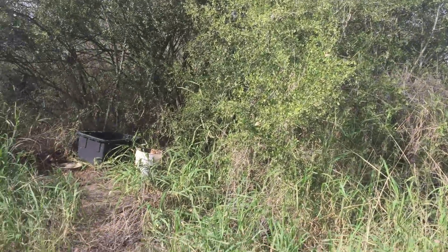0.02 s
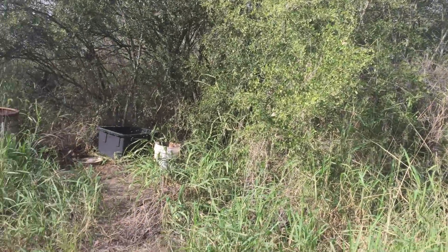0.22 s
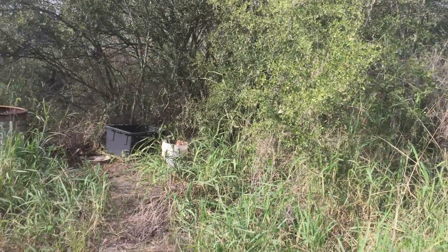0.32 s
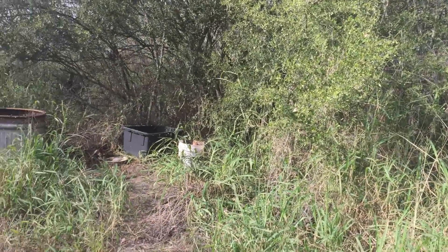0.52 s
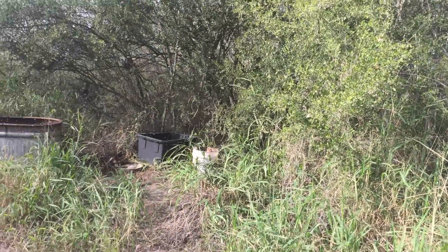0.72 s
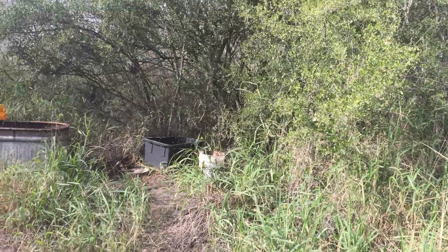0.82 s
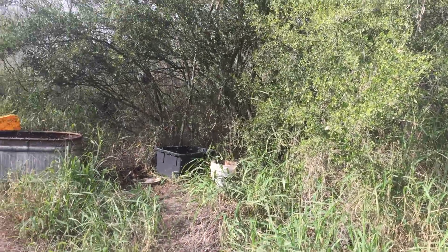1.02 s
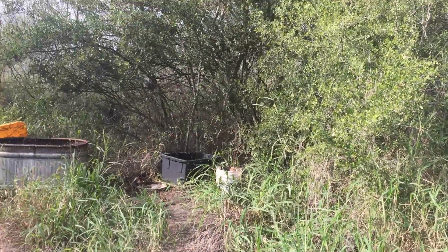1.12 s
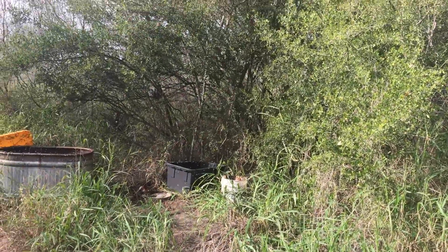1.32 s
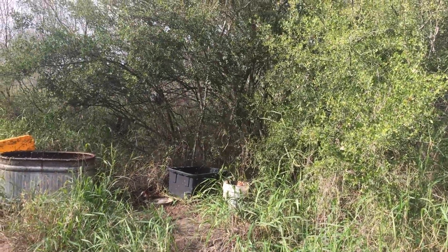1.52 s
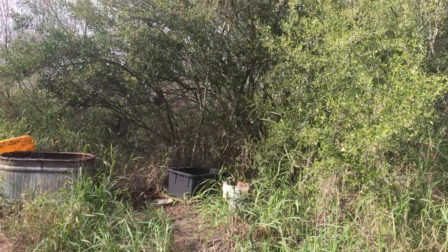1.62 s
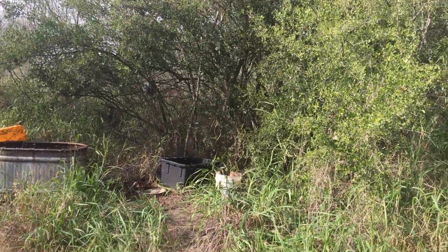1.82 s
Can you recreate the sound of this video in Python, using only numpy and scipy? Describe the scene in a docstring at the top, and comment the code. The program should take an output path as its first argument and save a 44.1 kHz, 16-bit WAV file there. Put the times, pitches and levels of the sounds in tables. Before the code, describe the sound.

Metal hammered hard on thin metal, five loud ringing clangs at a steady pace, outdoors in brush

```python
"""Metal hammered on metal in open brushland, about three blows a second: impulsive excitation of damped modes.
Each blow sums a contact crack and thud, discrete clang modes and a dense sheet-metal crash;
a softer set of modes, slower to decay, rings on from blow to blow, and the brush returns a diffuse noise echo.
Behind lie a brief sine hum, coloured-noise air, and narrow noise bands for an insect, faint rustles and chirps,
and a short swell at the very end. The microphone overloads, compressing the peaks, and is band-limited."""
import sys
import numpy as np
from scipy import signal
from scipy.fft import rfft, irfft, next_fast_len
from scipy.io import wavfile

SR = 44100
rng = np.random.default_rng(int(sys.argv[2]) if len(sys.argv) > 2 else 0)


def dump_mix(stems):
    """Bounce the given channels to the path in sys.argv[1] as a 16-bit WAV at rate SR."""
    frames = np.atleast_2d(stems).T  # one column per channel
    limited = np.clip(frames, -1, 1)  # hard clip at full scale
    pcm = np.round(limited * 32767).astype(np.int16)
    wavfile.write(sys.argv[1], SR, pcm)


N = 83790
T = np.arange(SR) / SR  # one second of time for each blow, t/s

# Blows, the first heard only as it rings out: [t/s, relative level/dB]
BLOW_TIMES = [(-.135, -2.5), (0.2034, -1), (0.5342, -1), (0.8766, -1), (1.2264, -1.5), (1.5689, -1.96)]
# Modes of the damped piece that clangs, some slow to build: [f/Hz, relative level/dB, t60/s, rise/s]
CLANG_MODES = [(495, -19, .13, .002), (567, -23, .19, .004), (727, -9, .12, .004), (796, -19, .17, .004),
               (818, -22, .16, .004), (944, -13, .2, .003), (1061, -16, .27, .05), (1189, -12, .12, .005),
               (1280, -19, .12, .001), (1368, -20, .12, .005), (1407, -20, .2, .005),
               (1558, -22, .27, .008), (1605, -2, .13, .05), (1634, -5, .17, .025), (1662, 3, .115, .045),
               (1703, 0, .13, .027), (1747, -21, .11, .001), (1768, -18, .19, .04), (2005, -13, .13, .038),
               (2042, -17, .2, .001), (2309, -23, .28, .007), (2543, -10, .125, .01),
               (2660, -9, .125, .028), (2774, -17, .11, .001), (2888, -13, .11, .002),
               (2916, -22, .26, .04), (3000, -15, .15, .002), (3113, -13, .14, .05), (3197, -21, .13, .001),
               (3647, -15, .135, .002), (4433, -15, .12, .004), (4577, -23, .18, .001),
               (4631, -14, .15, .001), (5318, -20, .12, .001), (5483, -18, .11, .001)]
# Modes of the free piece that rings on: [f/Hz, relative level/dB, t60/s, rise/s]
RING_MODES = [(119.6, -51, 1, .01), (166, -51, 0.99, .01), (205.6, -48, 1.4, 0.012),
              (242, -46.5, 1.84, 0.0084), (328.3, -46, 1.3, 0.013), (449, -40.5, 0.88, 0.0091),
              (703.4, -33, 0.88, .004), (752.7, -27, 1.04, 0.0045), (805.5, -32.5, 0.85, 0.0045),
              (1022, -28.5, 0.7, .004), (1070, -31.5, .62, 0.0044), (1230, -29, 0.65, .004),
              (1335, -40.5, 0.89, .004), (1485, -31, 1.02, 0.0036), (1625, -29, 0.7, .004),
              (1787, -38.5, 0.71, 0.0032), (2540, -46, 0.91, .004)]
# Spectral envelope of the sheet's dense modes: [f/Hz, relative density level/dB]
CRASH_SPECTRUM = [(60, -20), (250, -20), (480, -7.5), (660, -11.5), (900, -5), (1350, -0.5), (1900, -3.5),
                  (2300, -5.5), (3000, -6), (3900, -7), (5300, -6), (6300, -9.5), (7500, -10),
                  (8300, -14.5), (10800, -23), (15000, -17.5)]
# Decay of the sheet's dense modes: [f/Hz, t60/s]
CRASH_DECAY = [(150, 0.3), (600, 0.19), (1500, 0.23), (3000, 0.21), (5000, 0.15), (8000, 0.14),
               (15000, 0.12)]
# Spectral envelope of the echo from the brush: [f/Hz, relative level/dB]
BRUSH_SPECTRUM = [(100, -12.5), (500, -12), (1000, 10.5), (1700, 10.5), (3000, -6.5), (5000, -7),
                  (8000, -19.5), (14000, -27.5)]
# Decay of the echo from the brush: [f/Hz, t60/s]
BRUSH_DECAY = [(200, .9), (1500, .7), (4000, .48), (12000, .33)]
# Spectral envelope of the background air: [f/Hz, relative density level/dB]
AIR_SPECTRUM = [(20, -32), (50, -12), (85, -3), (140, -4), (300, -10), (1000, -13), (1700, -14),
                (2500, -21), (4500, -32), (9000, -41), (16000, -46)]
# Buzzes of the far insect: [start t/s, end t/s]
BUZZ_TIMES = [(.09, 0.47), (1.48, 2.5)]
# Faint rustles and chirps in the brush; the last row is a short noise swell at the very end,
# about when the next blow is due: [centre t/s, full width at 1/e t/s, centre f/Hz, level/dB]
NOISE_SWELLS = [(0.1, 0.074, 3140, -52.5), (0.51, 0.019, 6300, -58), (1.505, .05, 2950, -59),
                (1.5, 0.033, 4900, -59), (1.9, 0.022, 3200, -44)]

CRACK_DB, CRACK_T60_S, CRACK_CORNER_HZ = -4, 0.014, 5000
THUD_DB, THUD_HZ, THUD_T60_S = -28, 92, 0.072
CLANG_DB, RING_DB = 2, -0.5  # added to the levels in the mode tables
MODE_SCATTER_DB = 1  # standard deviation of mode level, drawn anew at each blow
CRASH_DB, CRASH_RISE_S = -4, 0.0029
CRASH_CHANGE = 0.21  # amplitude of the part drawn anew at each blow, beside the constant part
SHEET_UNEVEN_DB = 2  # standard deviation of level among the dense modes
BRUSH_DB, BRUSH_RISE_S = -31, .02
HUM_HZ, HUM_RMS_DB, HUM_END_S, HUM_FADE_S = 87.3, -54, .6, .1
AIR_DB = -47.5
BUZZ_HZ, BUZZ_HALF_WIDTH_HZ, BUZZ_DB, BUZZ_FADE_S = 12800, 170, -74.5, 0.01
SWELL_HALF_WIDTH = 0.16  # share of the centre frequency
CLIP_TOP, CLIP_KNEE = .7, 2.9  # asymptotic peak amplitude; sharpness of the bend
TOP_HZ = 15850  # upper limit of the sheet's modes and of the microphone


def amp(db):
    """Logarithmic level: decibels to amplitude ratio."""
    return 10 ** (np.asarray(db) / 20)


def along(points, hz):
    """Interpolation of (f/Hz, value) points on a logarithmic frequency axis."""
    f, v = np.transpose(points)
    return np.interp(np.log(hz + 1), np.log(f + 1), v)


def filtered(x, response):
    """Linear filtering: multiplication of the spectrum by a response of frequency."""
    m = next_fast_len(len(x) + 8192)
    spectrum = rfft(x, m)
    return irfft(spectrum * response(np.fft.rfftfreq(m, 1 / SR)), m)[:len(x)]


def noise(spectrum, size):
    """Spectral shaping of white noise, normalised to rms 1."""
    x = filtered(rng.standard_normal(size), lambda hz: amp(along(spectrum, hz)))
    return x / x.std()


def narrow(centre_hz, half_width_hz):
    """Band-pass filtering of noise to rms 1; amplitude halves at the half-width."""
    x = filtered(rng.standard_normal(N), lambda hz: 1 / (1 + ((hz - centre_hz) / half_width_hz) ** 2))
    return x / x.std()


def fall(t, t60):
    """Exponential damping: amplitude falls by 60 dB in t60."""
    return np.exp(-np.log(1000) * t / t60)


def rise(seconds):
    """Exponential build-up towards full amplitude."""
    return 1 - np.exp(-T / seconds)


def dying(spectrum, t60s):
    """Frequency-dependent damping: each band of noise decays at its own rate."""
    hz, t, bands = signal.stft(noise(spectrum, len(T)), SR, nperseg=256)
    damped = bands * fall(t, along(t60s, hz)[:, None])
    return signal.istft(damped, SR)[1][:len(T)]


def modes(table):
    """Modal superposition: damped sines start together, neighbours in opposite sense, and beat."""
    hz, db, t60, rise_s = np.transpose(table)[:, :, None]
    gain = amp(db + MODE_SCATTER_DB * rng.standard_normal(db.shape))
    sense = (-1) ** np.arange(len(hz))[:, None]
    envelope = rise(rise_s) * fall(T, t60)  # the vibration spreads through the metal, then decays
    return np.sum(sense * gain * envelope * np.sin(2 * np.pi * hz * T), axis=0)


def sheet_modes(count):
    """High modal density: many close, uneven modes of thin metal, nominally rms 1 at onset."""
    t = T[:SR // 2]
    hz = TOP_HZ * (np.arange(count) + rng.random(count))[:, None] / count
    gain = amp(along(CRASH_SPECTRUM, hz) + SHEET_UNEVEN_DB * rng.standard_normal(hz.shape))
    sines = np.sin(2 * np.pi * (hz * t + rng.random(hz.shape)))
    waves = sines * fall(t, along(CRASH_DECAY, hz))
    onset_rms = np.sqrt(np.sum(gain ** 2) / 2)
    return np.pad(np.sum(gain * waves, axis=0) / onset_rms, (0, len(T) - len(t)))


def contact():
    """Impact force: a high-passed noise crack and a low damped sine as the two pieces meet."""
    crack = filtered(rng.standard_normal(len(T)), lambda hz: hz / np.hypot(hz, CRACK_CORNER_HZ))
    thud = np.sin(2 * np.pi * THUD_HZ * T) * fall(T, THUD_T60_S)
    return amp(CRACK_DB) * crack * fall(T, CRACK_T60_S) + amp(THUD_DB) * thud


def brush_echo():
    """Diffuse scattering: the brush returns a noise tail that builds up and decays by band."""
    return amp(BRUSH_DB) * rise(BRUSH_RISE_S) * dying(BRUSH_SPECTRUM, BRUSH_DECAY)


def add(track, s, sound):
    """Linear superposition of a sound on the track from time s."""
    start = round(s * SR)
    part = sound[max(-start, 0):][:N - max(start, 0)]
    track[max(start, 0):][:len(part)] += part


def hammering():
    """Repeated excitation at one spot: every blow wakes nearly the same pattern of modes."""
    track = np.zeros(N)
    sheet = sheet_modes(count=640)
    for s, db in BLOW_TIMES:
        varied_sheet = sheet + CRASH_CHANGE * dying(CRASH_SPECTRUM, CRASH_DECAY)
        crash = amp(CRASH_DB) * rise(CRASH_RISE_S) * varied_sheet
        clang = amp(CLANG_DB) * modes(CLANG_MODES)
        ring = amp(RING_DB) * modes(RING_MODES)
        add(track, s, amp(db) * (contact() + crash + clang + ring + brush_echo()))
    return track


def hum():
    """Simple harmonic tone: a faint low sine that fades away early."""
    t = np.arange(N) / SR
    tone = np.sqrt(2) * np.sin(2 * np.pi * HUM_HZ * t)
    fade = np.clip((HUM_END_S - t) / HUM_FADE_S, 0, 1)
    return amp(HUM_RMS_DB) * tone * fade


def air():
    """Stationary random pressure: quiet outdoor air as coloured noise."""
    return amp(AIR_DB) * noise(AIR_SPECTRUM, N)


def insect():
    """Gated narrow-band noise: a thin, high buzz that comes and goes."""
    t = np.arange(N) / SR
    gate = np.zeros(N)
    for start, end in BUZZ_TIMES:
        gate += np.clip(np.minimum(t - start, end - t) / BUZZ_FADE_S, 0, 1)
    return amp(BUZZ_DB) * gate * narrow(BUZZ_HZ, BUZZ_HALF_WIDTH_HZ)


def noise_swells():
    """Gaussian envelopes on narrow-band noise: rustles and chirps, then a short swell at the very end."""
    t = np.arange(N) / SR
    track = np.zeros(N)
    for s, length, hz, db in NOISE_SWELLS:
        swell = np.exp(-(2 * (t - s) / length) ** 2)
        track += amp(db) * swell * narrow(hz, SWELL_HALF_WIDTH * hz)
    return track


def scene():
    """Linear superposition of the blows and the quiet outdoor background."""
    return (hammering() + hum() + air() + insect() + noise_swells())[None]


def record(dry):
    """Saturation and band-limiting: the microphone flattens peaks, then a steep low-pass acts."""
    clipped = dry / (1 + np.abs(dry / CLIP_TOP) ** CLIP_KNEE) ** (1 / CLIP_KNEE)
    return signal.sosfilt(signal.butter(20, TOP_HZ, fs=SR, output="sos"), clipped)


dry = scene()
out = record(dry)
dump_mix(out)
```